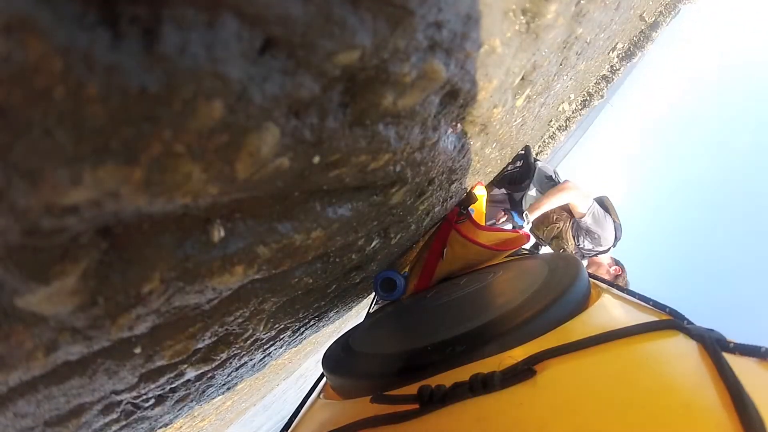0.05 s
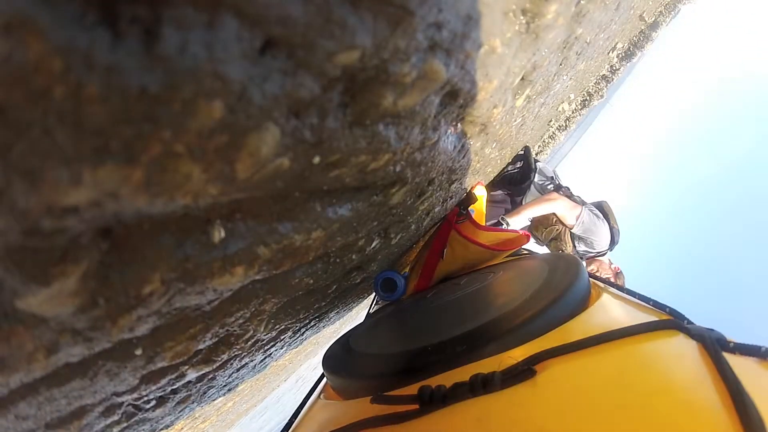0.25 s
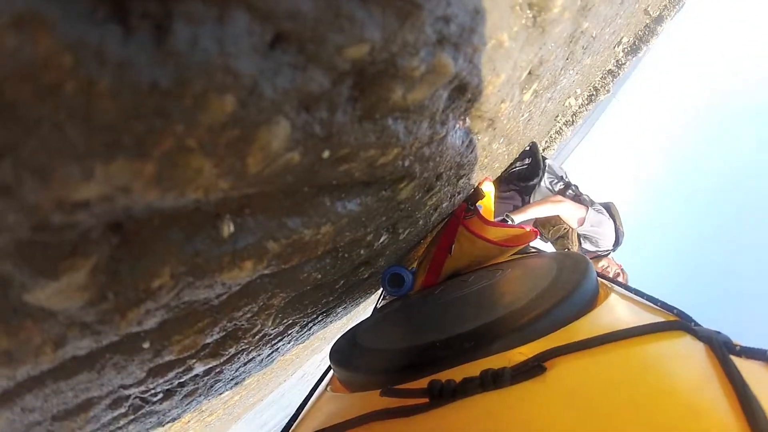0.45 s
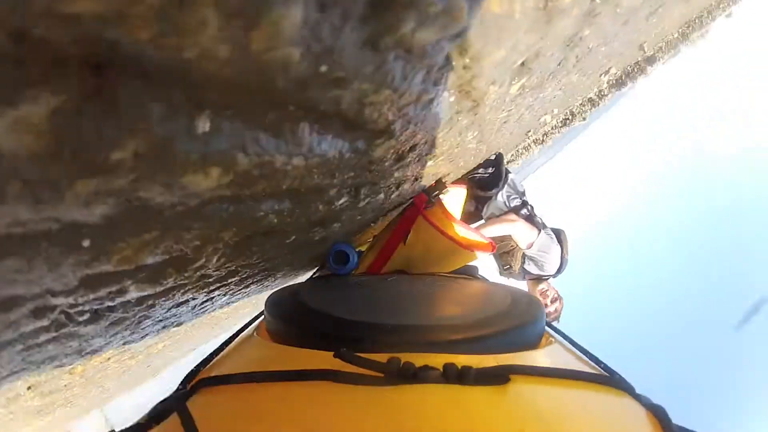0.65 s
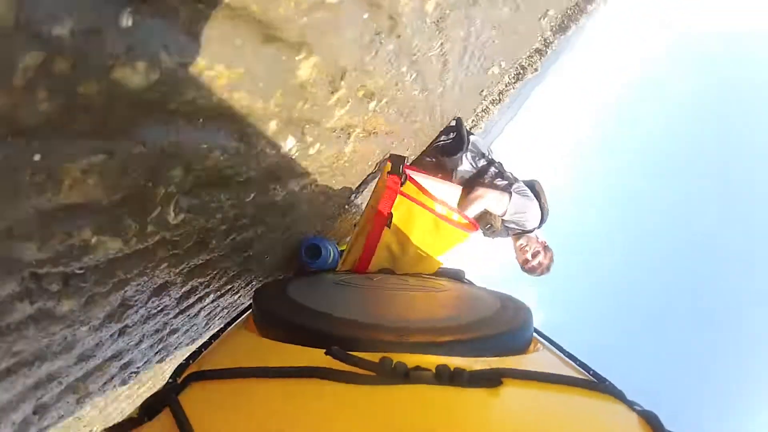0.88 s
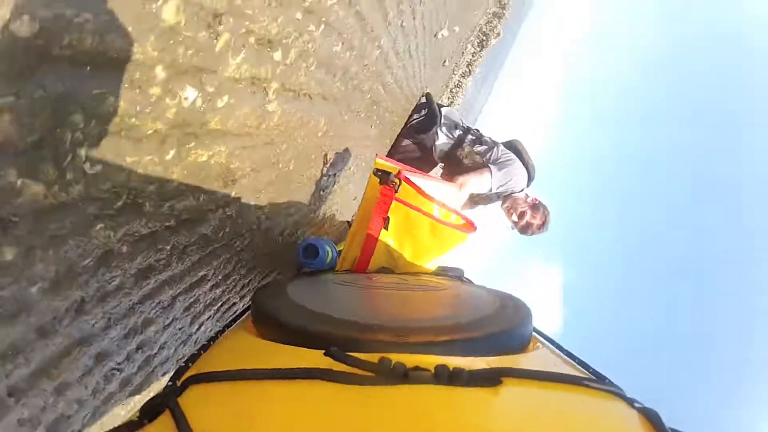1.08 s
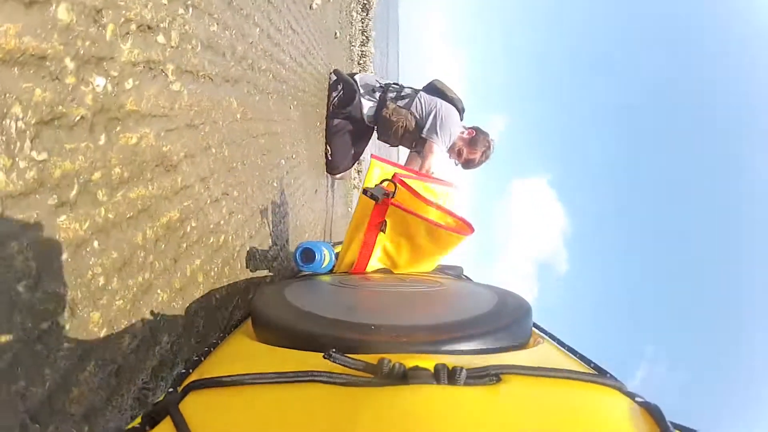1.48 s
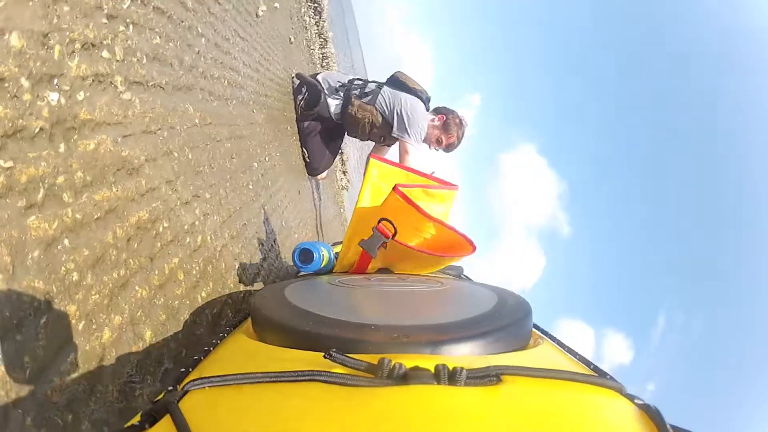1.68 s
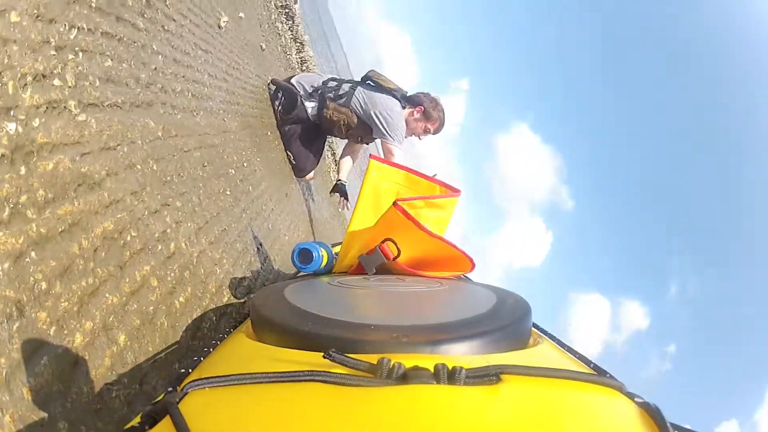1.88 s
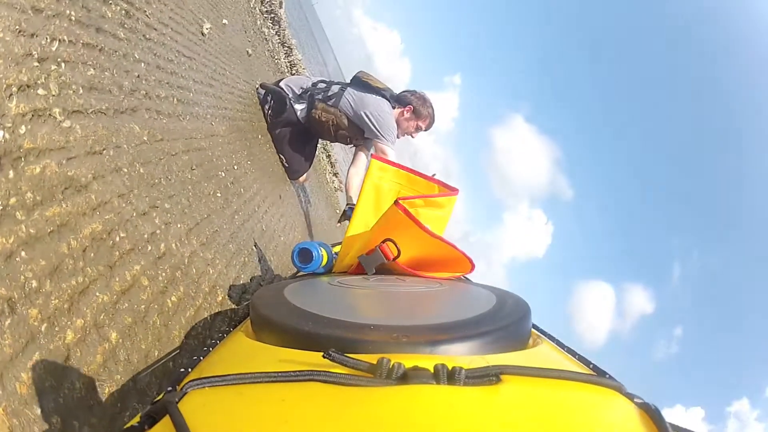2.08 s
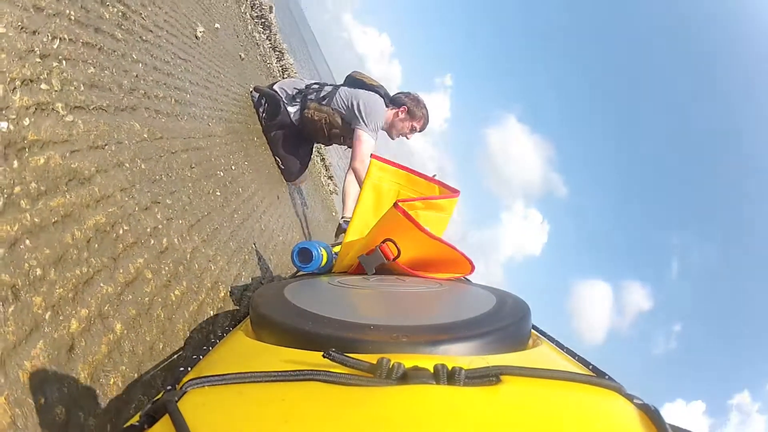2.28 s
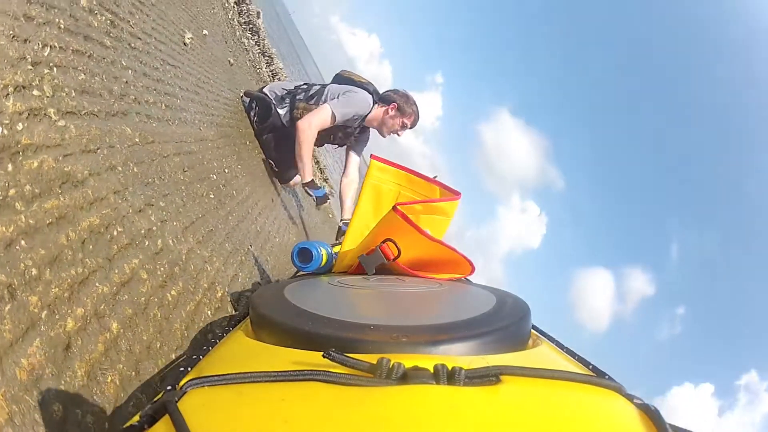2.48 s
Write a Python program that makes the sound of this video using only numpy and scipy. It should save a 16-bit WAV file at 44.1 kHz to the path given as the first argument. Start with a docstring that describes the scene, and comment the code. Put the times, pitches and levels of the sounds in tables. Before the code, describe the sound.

Plastic kayak hull scrapes and knocks along a concrete ramp, booming, then rattling softly.

```python
"""A plastic kayak on a ribbed concrete ramp, outdoors, heard close up from a camera microphone on its deck.
First the boat is rolled upright and the hollow hull thumps; stones crack and scrape under the keel.
Then it is dragged, juddering over the ribs in quick knocks that keep a deep boom ringing.
At last the knocks shrink to a soft rattle of fittings and the boom dies away.
Throughout, the camera clips the loudest peaks and adds a thin, whistling edge."""
import sys
import numpy as np
from scipy import signal
from scipy.fft import rfft, irfft
from scipy.io import wavfile

SR = 44100
rng = np.random.default_rng(int(sys.argv[2]) if len(sys.argv) > 2 else 0)


def unload_wav(signal):
    """Save mono or channel-first audio to the path in sys.argv[1] as 16-bit WAV at rate SR, clipped to [-1, 1]."""
    wavfile.write(
        sys.argv[1],
        SR,
        np.round(np.clip(np.atleast_2d(signal).T, -1, 1) * 32767).astype(np.int16),
    )


N = 116865

# modes of the hollow hull (frequency [Hz], gain [dB], t60 [s])
HULL_MODES = [(53.3, -12, 0.13), (118, -7, 0.11), (143.5, 2, .15), (193, -4, 0.064), (254.2, -2, 0.09),
              (316.6, 2, 0.12), (392, -7.5, 0.038), (429, -11, 0.08), (580, -6, 0.032), (791, -9, 0.023)]
# short, higher modes of the plastic shell (frequency [Hz], gain [dB], t60 [s])
SHELL_MODES = [(714, -2, 0.01), (830, 1.5, 0.03), (890, -1.5, 0.031), (1110, 5.5, 0.012), (1376, -1, 0.028),
               (1790, -0.5, 0.015), (2480, -8.5, 0.016)]
# the hull striking the ribs of the ramp (time [s], crunch level [dB], thud force [dB])
RIB_KNOCKS = [(0.729, -39.5, -33), (0.781, -32, -20.5), (0.843, -20.5, -2.5), (0.8868, -23.5, -10),
              (0.9444, -21.5, -7), (0.9881, -24, -18), (1.043, -22, -5.5), (1.0903, -27, -14.5),
              (1.139, -24, -8.5), (1.189, -24, -7.5), (1.234, -25.5, -10), (1.273, -26.5, -10.5),
              (1.315, -29, -13), (1.354, -30, -12), (1.394, -36, -21), (1.421, -31, -26),
              (1.464, -38.5, -35.5), (1.514, -34, -16), (1.538, -28.5, -13), (1.603, -18, 0.5),
              (1.641, -28, -9.5), (1.7, -29, -11.5), (1.727, -30.5, -11), (1.773, -23.5, -21.5),
              (1.796, -35.5, -30.5), (1.838, -34, -8.5), (1.87, -28.5, -12), (1.898, -41, -26),
              (1.922, -27, -16)]
# bright spectrum of snapping stone and sand (frequency [Hz], gain [dB])
CRACK_COLOUR = [(800, -15), (1500, -3.5), (2250, 4.5), (2650, -7.5), (2900, 0), (3150, -14), (3600, 0),
                (4100, -9.5), (5300, -14), (6000, -14.5)]
# dull spectrum of grit crushed under the hull (frequency [Hz], gain [dB])
CRUNCH_COLOUR = [(200, 2.5), (500, 4), (800, -5), (1300, -1), (2000, -1), (2400, -6.5), (2700, -13.5),
                 (3150, -21.5), (3650, -13), (4200, -28.5), (6000, -40)]
# spectrum of loose fittings and trickling grit (frequency [Hz], gain [dB])
RATTLE_COLOUR = [(500, 3.5), (1200, 3.5), (2200, 10.5), (2600, -6.5), (3150, -4.5), (3650, 5), (4200, -24),
                 (6000, -39)]


def undb(db):
    """Decibels to gain."""
    return 10 ** (np.asarray(db) / 20)


def curve(rows):
    """Join (time [s], value) rows by straight lines."""
    return np.interp(np.arange(N) / SR, *np.array(rows).T)


def colour(x, points):
    """Minimum-phase filter shaped by (frequency [Hz], gain [dB]) rows; keeps the power of white noise."""
    size = 16384
    hz, db = np.array(points).T
    bin_hz = np.fft.rfftfreq(size, 1 / SR)
    gain = undb(np.interp(np.log(bin_hz + 1), np.log(hz), db))
    gain = gain / np.sqrt(np.mean(gain ** 2))
    cepstrum = irfft(np.log(gain))
    cepstrum[1:size // 2] *= 2
    cepstrum[size // 2 + 1:] = 0
    return signal.fftconvolve(x, irfft(np.exp(rfft(cepstrum))))[:N]


def add(out, at, sound):
    """Mix a sound in at a time in seconds."""
    i = int(at * SR)
    out[i:i + len(sound)] += sound[:max(N - i, 0)]


def swell(rise_ms, t60_ms):
    """Envelope that rises to 1 and dies away."""
    ms = np.arange(SR // 5) * 1000 / SR
    return np.clip(ms / rise_ms, 0, 1) ** 2 * undb(-60 * np.maximum(ms - rise_ms, 0) / t60_ms)


def burst(rise_ms, t60_ms):
    """One brief, rough contact: noise that swells to 1 and dies."""
    envelope = swell(rise_ms, t60_ms)
    return envelope * rng.choice([-1, 1], len(envelope))


def push(contact_ms):
    """Smooth force pulse of unit area: the longer the contact, the duller the blow."""
    u = np.arange(SR // 20) * 1000 / SR / contact_ms
    force = u ** 2 * np.exp(-2 * np.pi * u)
    return force / force.sum()


def ring(force, modes):
    """A force drives decaying modes, which radiate little below the lowest of them."""
    t = np.arange(SR // 2) / SR
    response = sum(undb(db - 60 * t / t60) * np.sin(2 * np.pi * hz * t) for hz, db, t60 in modes)
    low_cut = signal.butter(2, .5 * modes[0][0], "high", fs=SR, output="sos")
    return signal.sosfilt(low_cut, signal.fftconvolve(force, response)[:N])


def grit(grains_per_s=3900, spread_db=4.5):
    """Dense tiny collisions of uneven size, rms 1."""
    hits = (rng.random(N) < grains_per_s / SR) * rng.choice([-1, 1], N)
    grains = hits * undb(spread_db * np.minimum(rng.exponential(size=N), np.pi))
    return grains / grains.std()


def outdoor_air():
    """A faint, steady hiss of open air around the ramp."""
    return undb(-69.5) * rng.standard_normal(N)


def sway():
    """The swaying boat puts a sub-bass rumble under the microphone."""
    # strength of the rumble (time [s], level [dB])
    sway_level = [(.01, -59), (.19, -42.5), (.25, -27), (.36, -35.5), (.47, -27), (.57, -12), (.68, -40),
                  (.83, -34), (.9, -21), (1.9, -26), (2.3, -26.5), (2.45, -44), (2.64, -45.5)]
    # its spectrum (frequency [Hz], gain [dB])
    sway_colour = [(10, -1), (25, -7.5), (52, 2.5), (100, -8), (200, -22.5), (500, -80.5)]
    return colour(rng.standard_normal(N), sway_colour) * undb(curve(sway_level))


def rubbing():
    """The hull rubs on concrete, dull and grainy, with a faint bright crackle of sand."""
    # strength of the rubbing (time [s], level [dB])
    rub_level = [(.14, -67), (.21, -58), (.235, -43.5), (.38, -52.5), (.46, -31.5), (.55, -27.5),
                 (.68, -52.5), (.82, -41.5), (.9, -43.5), (1.46, -45.5), (1.62, -36), (1.74, -49.5),
                 (1.785, -24), (1.83, -38.5), (1.89, -33), (1.98, -37), (2.16, -44.5), (2.205, -32),
                 (2.27, -40.5), (2.42, -56), (2.535, -55), (2.562, -38.5), (2.64, -55.5)]
    # its spectrum (frequency [Hz], gain [dB])
    rub_colour = [(60, -13.5), (160, 5.5), (250, 1.5), (320, 2), (520, -8), (900, -17.5), (1100, -10),
                  (1450, -30), (1900, -21.5), (2350, -24.5), (2550, -35), (3700, -48), (6000, -64)]
    rub = colour(grit(), rub_colour)
    sand = undb(-29) * colour(grit(), CRACK_COLOUR)
    return (rub + sand) * undb(curve(rub_level))


def fittings(even_from_s=2.2222, period_s=.0416, even_db=-50.5, fade_db_per_s=5.5):
    """Loose deck fittings near the microphone chatter, then settle into an even, fading tick."""
    # the first, uneven ticks (time [s], level [dB])
    chatter = [(1.963, -45), (1.989, -46.5), (2.012, -49), (2.036, -44), (2.062, -43.5), (2.089, -43),
               (2.132, -41.5), (2.154, -46)]
    even_times = np.arange(even_from_s, N / SR, period_s)
    even_ticks = [(at, even_db - fade_db_per_s * (at - even_from_s)) for at in even_times]
    ticks = np.zeros(N)
    for at, db in chatter + even_ticks:
        add(ticks, at, undb(db) * burst(rise_ms=2.5, t60_ms=25))
    return colour(ticks, RATTLE_COLOUR)


def scuffs(rise_ms=6.8, top_hz=2600, trail_db=-18):
    """Grit scuffs under the sliding hull, ringing its shell, and trickles on after each knock."""
    # short slides over grit (time [s], level [dB], t60 [ms])
    slides = [(.216, -43.5, 75), (0.534, -26, 66), (1.767, -29, 100), (1.925, -23.5, 27), (2.209, -35, 60),
              (2.548, -43, 49)]
    slide, trail = np.zeros(N), np.zeros(N)
    for at, db, t60_ms in slides:
        add(slide, at, undb(db) * swell(rise_ms, t60_ms))
    for at, crunch_db, _ in RIB_KNOCKS:
        add(trail, at, undb(crunch_db + trail_db) * swell(rise_ms, t60_ms=29))
    grains = signal.sosfilt(signal.butter(2, top_hz, fs=SR, output="sos"), grit() * slide)
    trickle = colour(grit() * trail, RATTLE_COLOUR)
    return colour(grains, CRUNCH_COLOUR) + undb(-35) * ring(grains, SHELL_MODES) + trickle


def stones(rise_ms=1.74, t60_ms=11.4):
    """Stones snap under the keel, clack in the shell and run together into a short scrape."""
    # single stones cracking (time [s], snap level [dB], clack force [dB])
    cracks = [(0.33, -43.5, -44), (0.408, -30, -19), (0.4158, -12.5, -19), (0.4211, -32, -22.5),
              (0.461, -32, -29.5), (0.4825, -15.5, -34), (0.492, -6.5, -33), (0.545, -35, -15),
              (0.587, -19, -14.5), (0.6006, -9, -27), (0.6088, -14.5, -10), (0.6185, -11.5, -17),
              (0.6292, -9, -8.5), (0.6435, -9.5, -11.5)]
    # the keel grinding over grit (time [s], level [dB])
    scrape_level = [(.578, -38), (.586, -25), (.598, -26.5), (.612, -12), (.624, -31), (.638, -38),
                    (.65, -45), (.664, -54)]
    t = np.arange(N) / SR
    grinding = (t > scrape_level[0][0]) & (t < scrape_level[-1][0])
    scrape = grit() * undb(curve(scrape_level)) * grinding
    crunch = undb(-3) * colour(scrape, CRUNCH_COLOUR)
    snaps, clacks = scrape.copy(), undb(-11) * scrape
    for at, snap_db, clack_db in cracks:
        add(snaps, at, undb(snap_db) * burst(rise_ms, t60_ms))
        add(clacks, at, undb(clack_db) * burst(rise_ms, t60_ms / 2))
    return crunch + colour(snaps, CRACK_COLOUR) + undb(-23.5) * ring(clacks, SHELL_MODES)


def thumps():
    """The hull drops onto the ramp and rings hollow right under the microphone."""
    # blows on the hull (time [s], force [dB], contact time [ms])
    blows = [(0.155, -46, 1.5), (.223, -20, 1.3), (.231, -22.5, 1.05), (.239, -18, 2.45),
             (0.248, -16.5, 1.8), (.316, -24, 1.3), (0.399, -28.5, 0.29), (0.463, -16.5, 8.7),
             (0.513, -9, 6.5), (0.539, -5.5, 4.6), (0.548, -4.5, 4.76), (0.583, -9, 7.7),
             (.644, -26.5, 2.3), (1.772, -28, 3), (2.177, -22, 3.7), (2.198, -20, 3.7), (2.555, -41, 1.1)]
    force = np.zeros(N)
    for at, db, contact_ms in blows:
        add(force, at, undb(db) * push(contact_ms))
    return ring(force, HULL_MODES)


def judder(thud_hz=158, thud_t60_s=0.02):
    """Each rib of the ramp gives a damped thud, a small crunch and a faint ring of the hull."""
    crunch, force = np.zeros(N), np.zeros(N)
    for at, crunch_db, thud_db in RIB_KNOCKS:
        add(crunch, at, undb(crunch_db) * burst(rise_ms=3.05, t60_ms=22.5))
        add(force, at, undb(thud_db) * push(contact_ms=1.92))
    thuds = ring(force, [(thud_hz, 0, thud_t60_s)])
    return colour(crunch, CRUNCH_COLOUR) + thuds + undb(-26) * ring(force, HULL_MODES)


def boom():
    """One deep resonance of the dragged, juddering hull rises slowly in pitch."""
    # pitch of the resonance (time [s], frequency [Hz])
    boom_pitch = [(.73, 69.5), (.98, 70), (1.06, 72.5), (1.33, 76), (1.68, 75), (1.79, 77.5), (2.08, 77),
                  (2.22, 80), (2.64, 81)]
    # its surges and final fade (time [s], rms level [dB])
    boom_level = [(.715, -61), (.74, -23), (.785, -24.5), (.81, -24), (.838, -47), (.85, -6), (.935, -18.5),
                  (.955, -6), (1.005, -17.5), (1.038, -14.5), (1.052, -6), (1.135, -15), (1.205, -7.5),
                  (1.3, -13), (1.33, -8.5), (1.41, -10.5), (1.5, -12.5), (1.54, -8), (1.68, -10.5),
                  (1.715, -9), (1.79, -12.5), (1.82, -22.5), (1.853, -9), (1.885, -15), (1.915, -36.5),
                  (1.95, -19.5), (2.04, -18), (2.09, -19.5), (2.205, -23.5), (2.24, -18), (2.36, -23),
                  (2.44, -27), (2.54, -32), (2.64, -40.5)]
    phase = 2 * np.pi * np.cumsum(curve(boom_pitch)) / SR
    return np.sqrt(2) * undb(curve(boom_level)) * np.sin(phase)


def scene():
    """The boat reaches one microphone through the deck, over faint outdoor air."""
    mix = outdoor_air() + thumps() + stones() + judder() + scuffs() + fittings()
    return (mix + boom() + rubbing() + sway())[None]


def record(dry, hold_hz=12000, clip_level=0.5097, top_hz=15400):
    """The camera samples slowly, clips and holds each sample, mirroring the sound around the hold rate."""
    samples = np.clip(signal.resample_poly(dry, hold_hz, SR, axis=1), -clip_level, clip_level)
    steps = np.repeat(samples, 8, axis=1)
    held = signal.resample_poly(steps, SR, 8 * hold_hz, axis=1)[:, :N]
    high_cut = signal.ellip(6, .2, 70, top_hz, fs=SR, output="sos")
    return signal.sosfilt(high_cut, held)


dry = scene()
out = record(dry)
unload_wav(out)
```